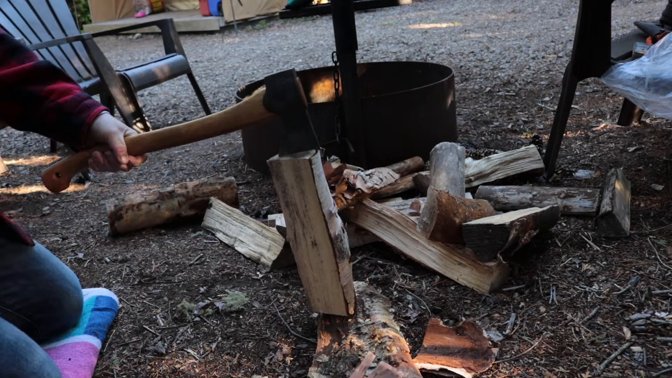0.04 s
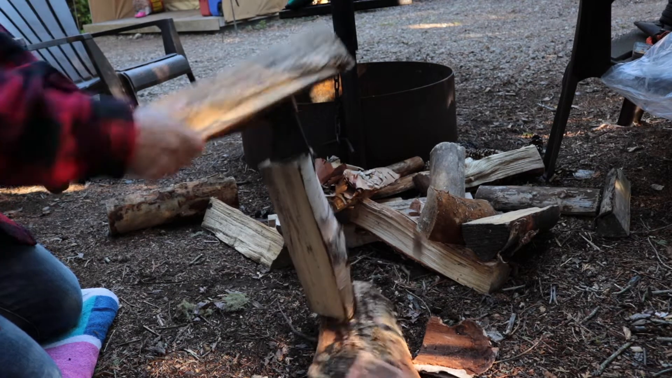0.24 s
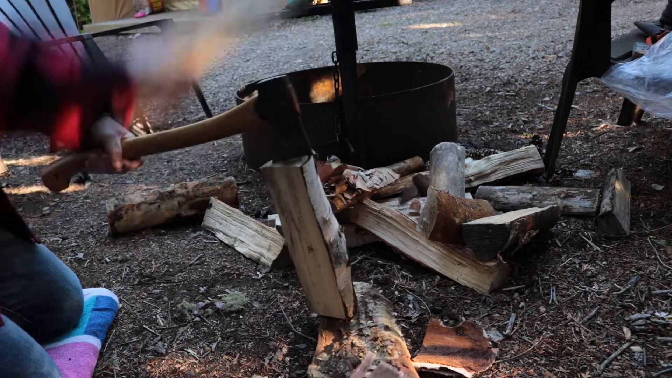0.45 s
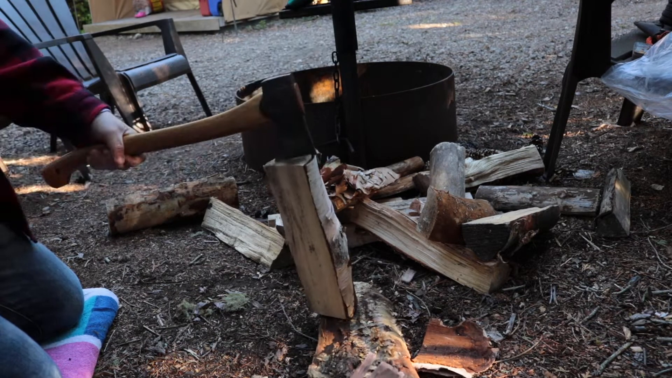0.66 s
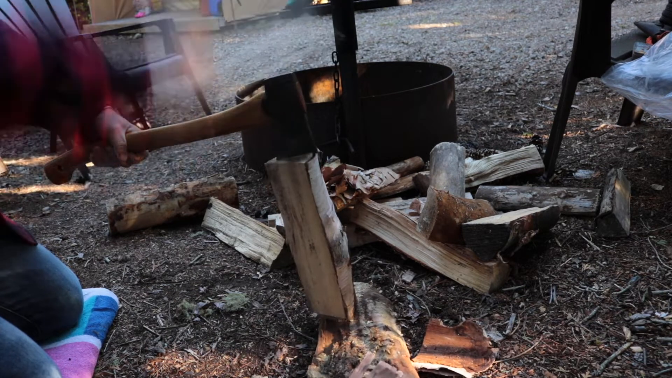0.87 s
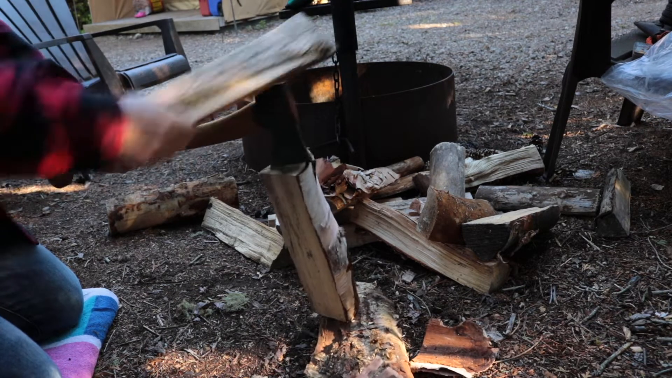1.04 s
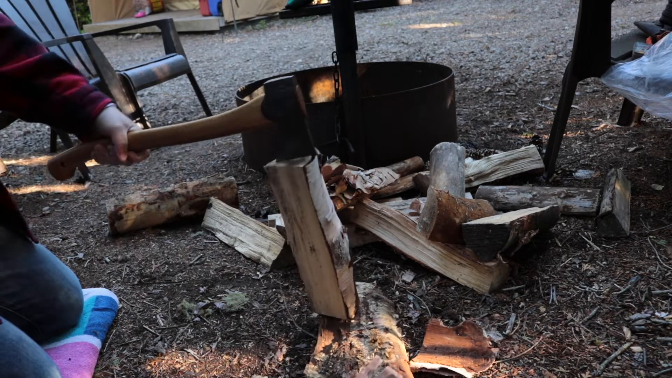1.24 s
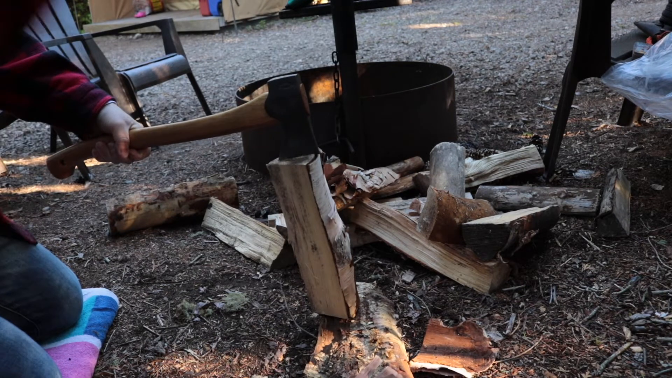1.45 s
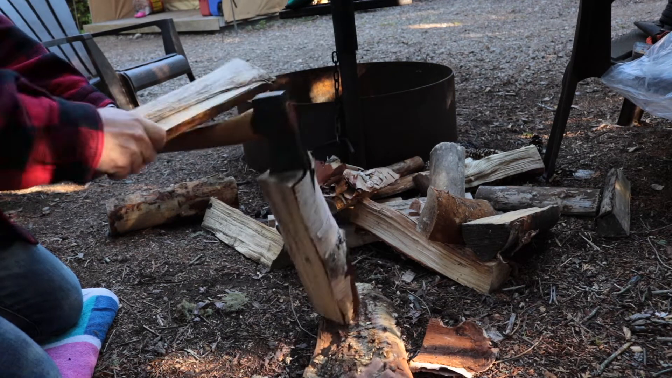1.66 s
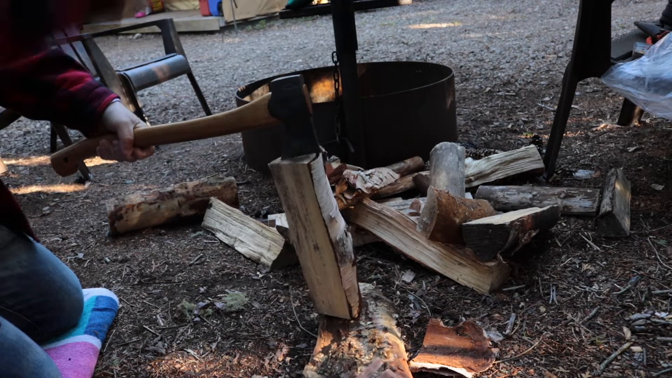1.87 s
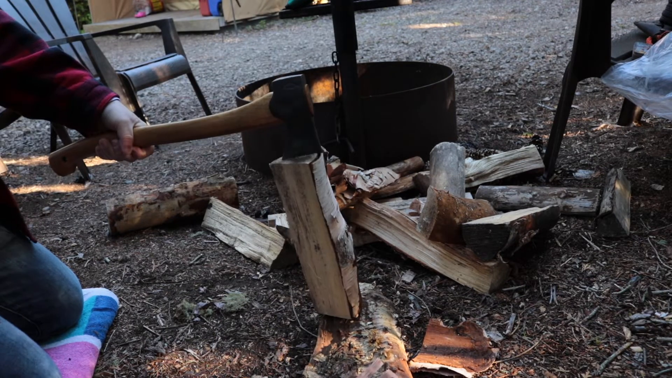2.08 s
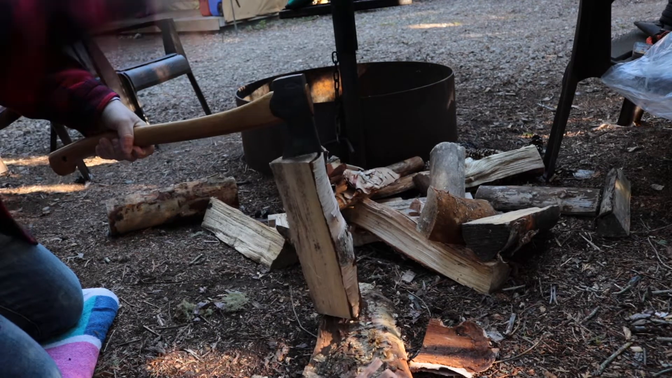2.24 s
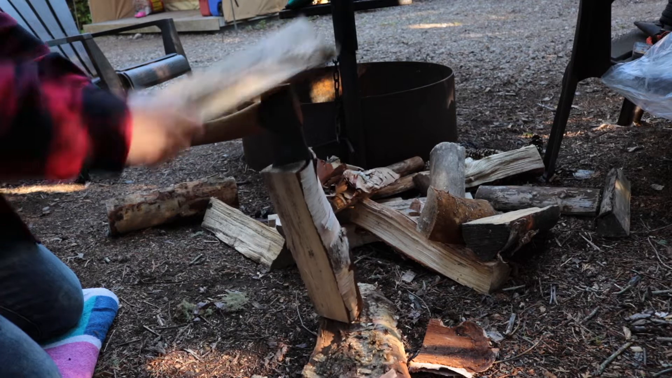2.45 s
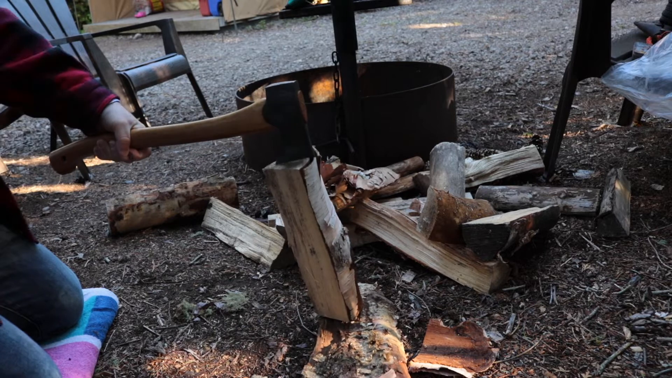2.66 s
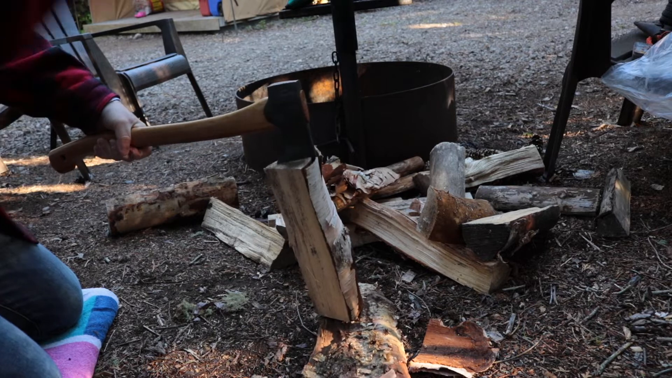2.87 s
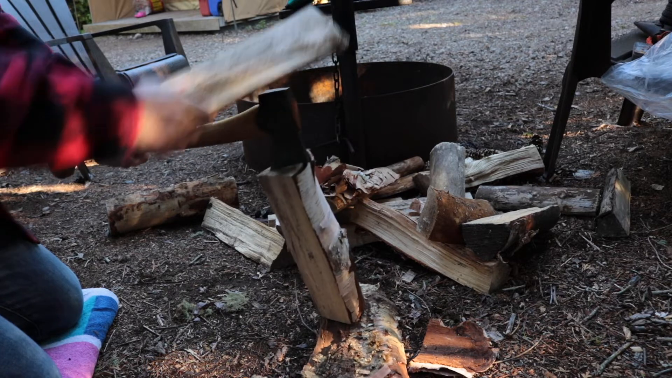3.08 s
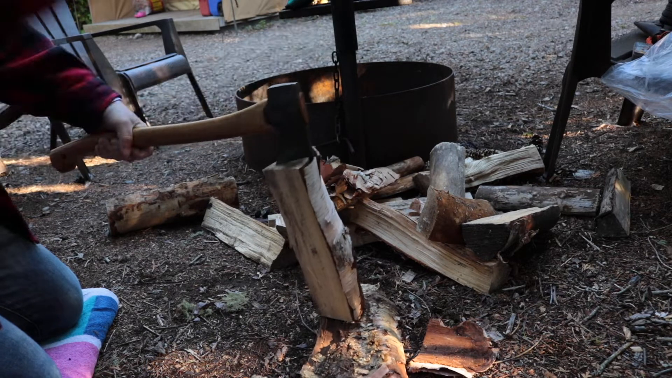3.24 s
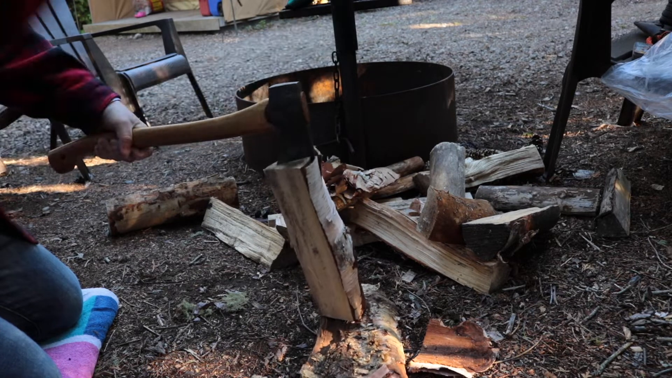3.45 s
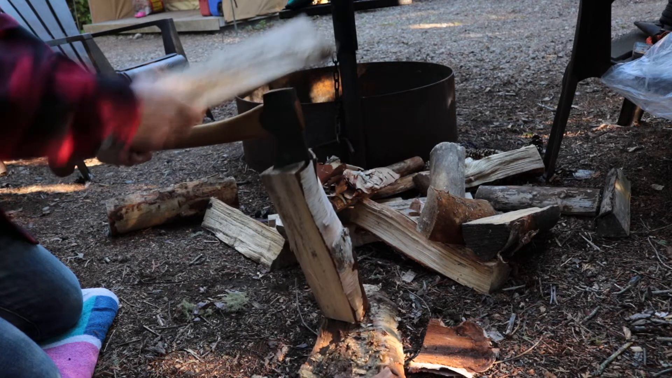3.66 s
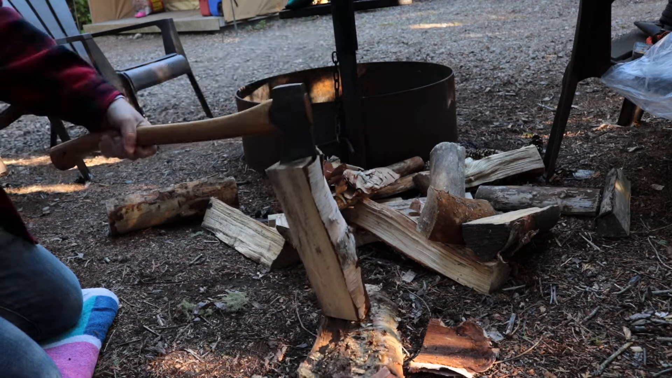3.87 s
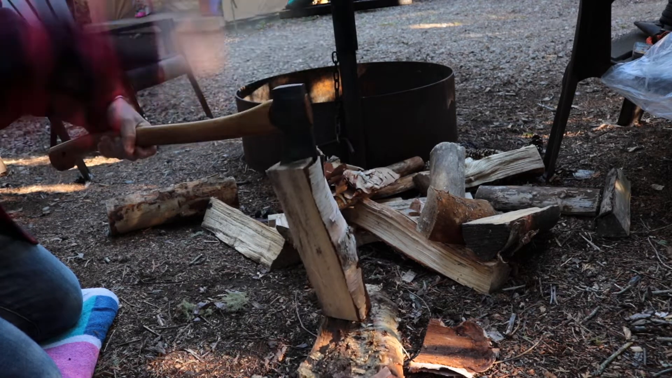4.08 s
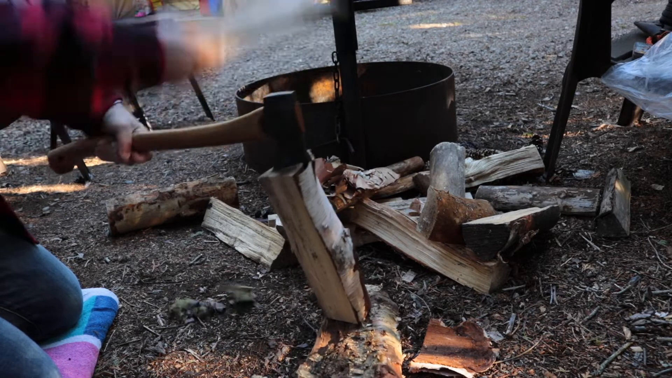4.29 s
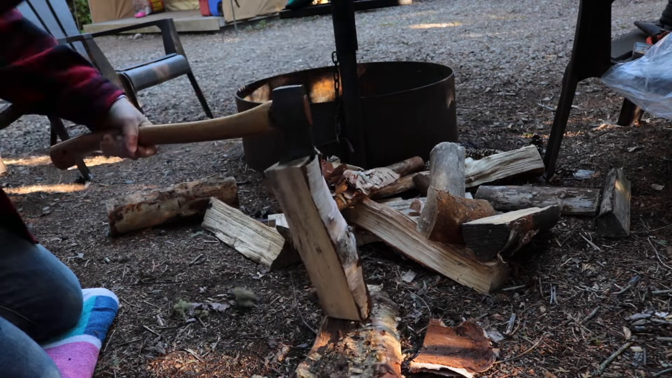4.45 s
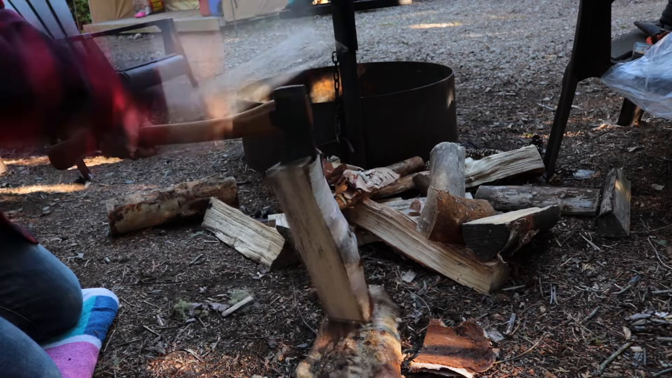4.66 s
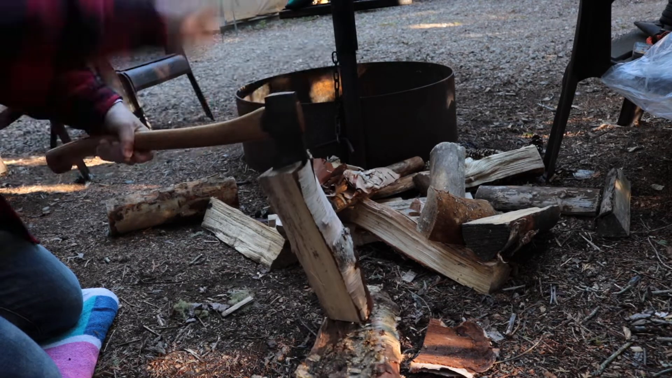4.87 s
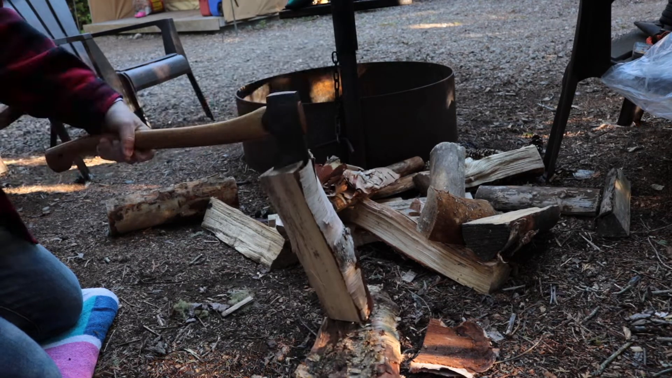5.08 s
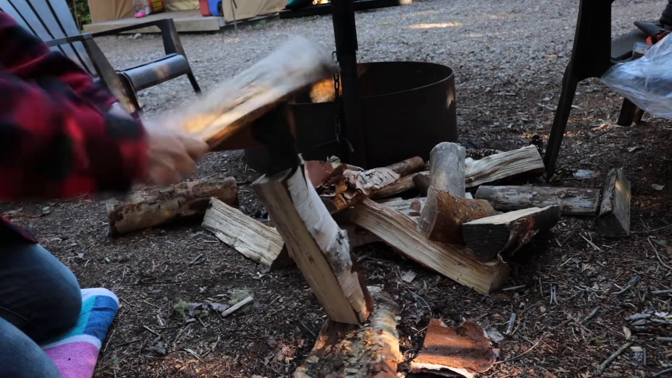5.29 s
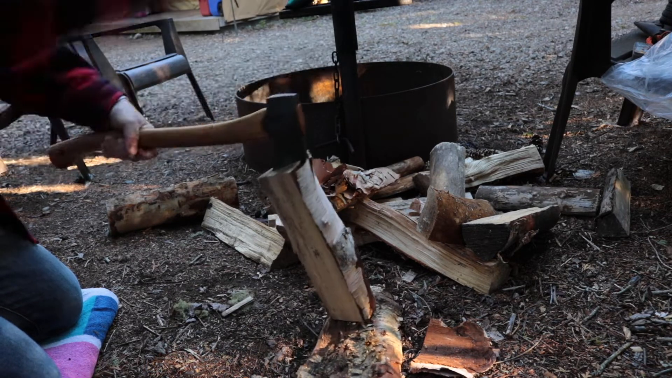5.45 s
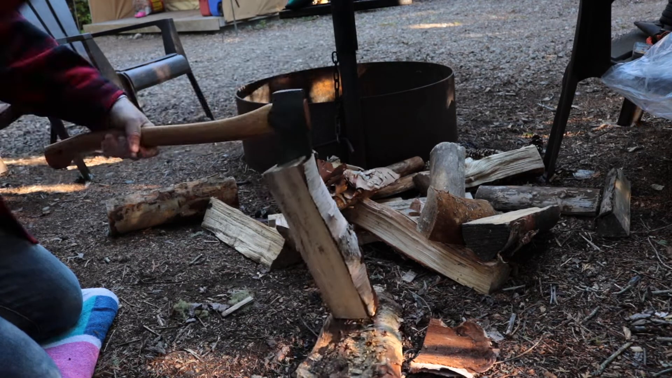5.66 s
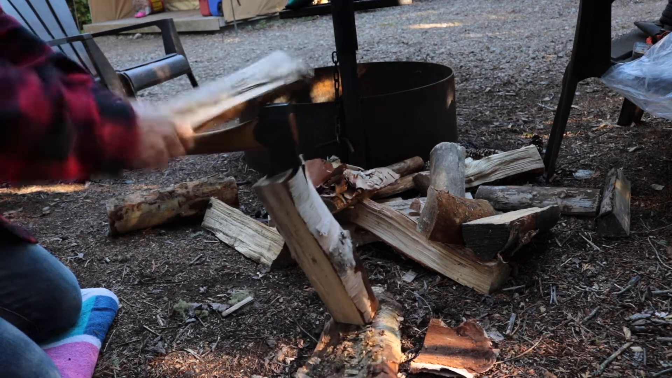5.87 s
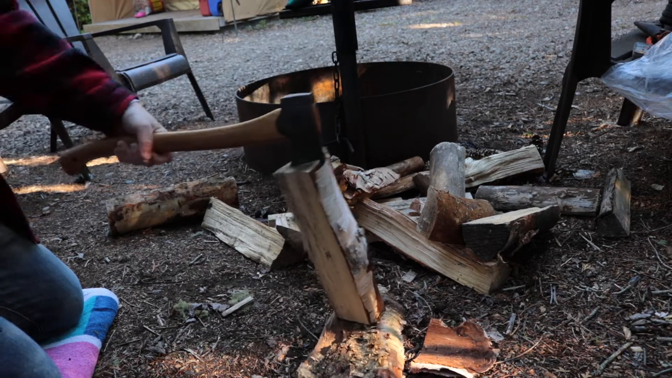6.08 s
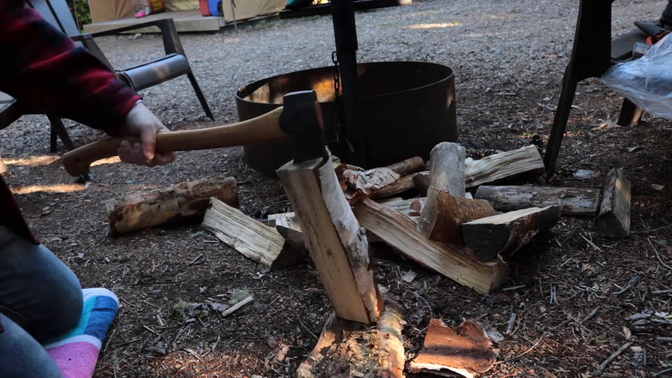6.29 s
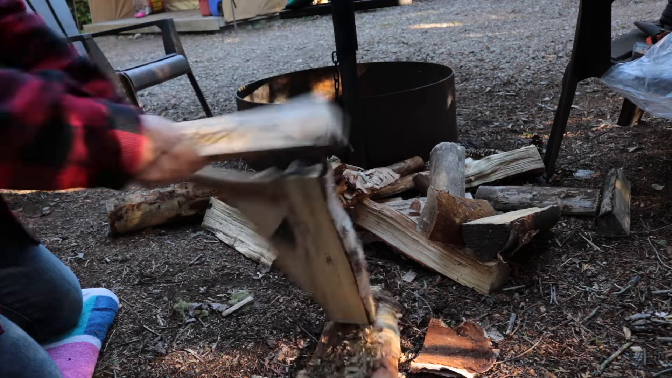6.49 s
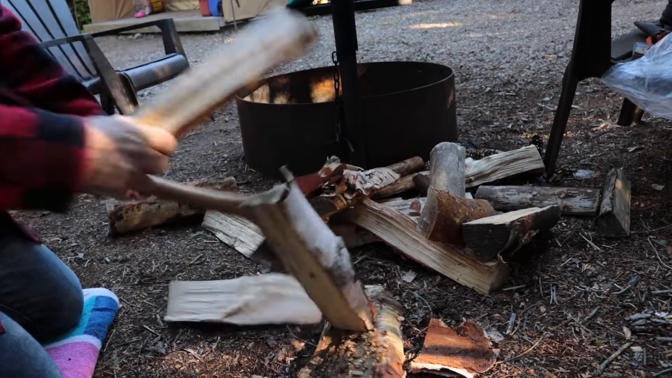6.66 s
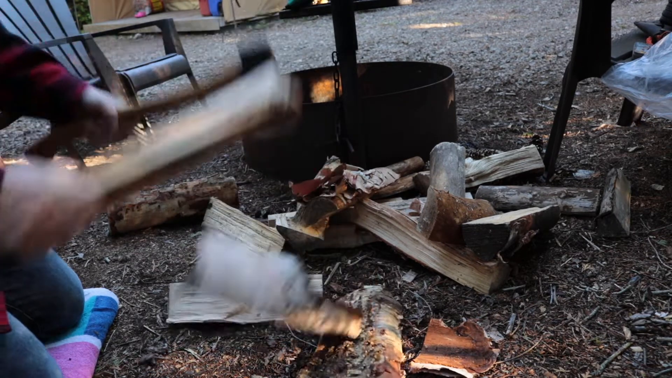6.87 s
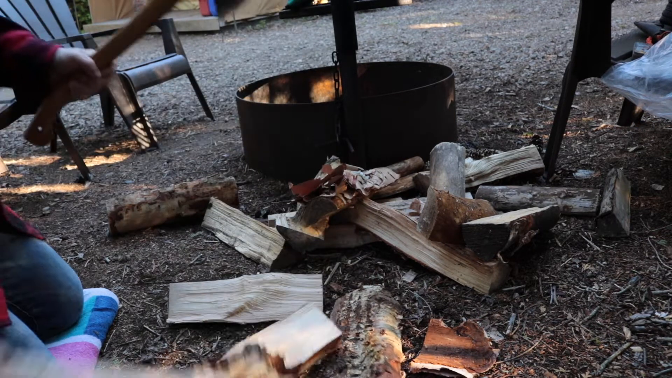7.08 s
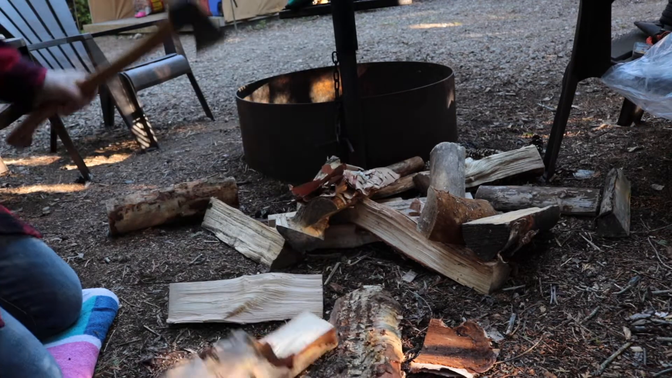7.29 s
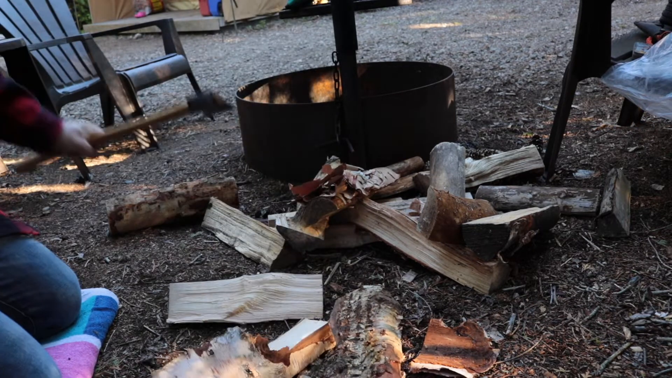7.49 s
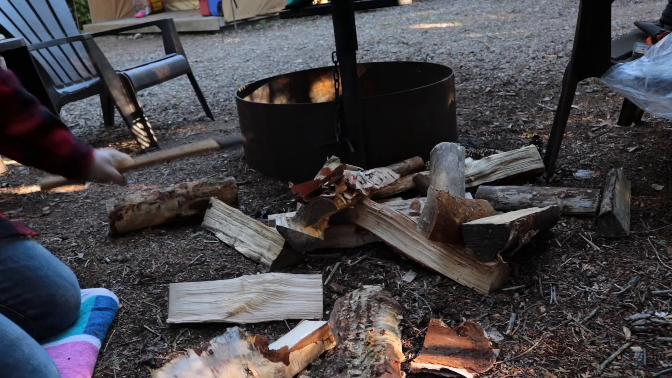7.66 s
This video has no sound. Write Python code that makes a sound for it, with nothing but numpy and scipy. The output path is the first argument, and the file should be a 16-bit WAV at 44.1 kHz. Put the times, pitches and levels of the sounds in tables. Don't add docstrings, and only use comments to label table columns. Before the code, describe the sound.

Outdoors among trees, with low wind rumble and faint leaf hiss, a wooden baton pounds a hatchet into a log very close to an overloading microphone. Blows land at about 0.2, 0.9, 1.6, 2.3, 3.0, 3.6, 4.1, 4.7, 5.3 and 5.8 s: hollow, short woody rings with a hard attack, some with a brief metallic clank, each over a dull ground thump. The log's foot knocks on its block right after, and a short, diffuse echo returns from the trees. Tiny fibre creaks, ticks and soft litter or sleeve rustles fill the gaps. At 5.96 s the wood splits with a loud, dry crack. A final blow at 6.5 s breaks through with sharp snaps; one half thuds down near 6.7 s, the other near 7.0 s, then bark scrapes, rolls and clicks among twigs, fading into quiet rustling and wind.

```python
import sys
import numpy as np
from scipy import signal
from scipy.fft import rfft, irfft
from scipy.io import wavfile
from scipy.ndimage import uniform_filter1d, map_coordinates

SR = 44100
rng = np.random.default_rng(int(sys.argv[2]) if len(sys.argv) > 2 else 0)


def nominal_scale(level):
    x = np.asarray(level, float) / 20
    return 10 ** x


def put_to_file(sound):
    columns = np.atleast_2d(sound).T
    safe = np.clip(columns, -1, 1)
    whole_steps = np.round(safe * 32767)
    wavfile.write(sys.argv[1], SR, whole_steps.astype(np.int16))


N = 340893


def along(points, hz):
    f, v = np.transpose(points)
    return np.interp(np.log(hz + 1), np.log(f + 1), v)


def curves(rows):
    s, *cols = np.transpose(rows)
    return [np.interp(np.arange(N) / SR, s, c) for c in cols]


def unit(x):
    return x / np.sqrt(np.mean(x ** 2) + 1e-20)


def wobble(rate):
    knots = rng.standard_normal(int(N * rate / SR) + 4)
    return map_coordinates(knots, [np.arange(N) * rate / SR])


def bump(middle_s, half_s):
    return np.exp(-((np.arange(N) / SR - middle_s) / half_s) ** 2)


def swells(rows):
    return sum(nominal_scale(db) * bump(s, half_s) for s, db, half_s in rows)


def rush(spectrum, patchy_db):
    z = signal.stft(rng.standard_normal(N), nperseg=512)[2]
    field = uniform_filter1d(uniform_filter1d(rng.standard_normal(z.shape), 6, 0), 12, 1)
    x = signal.istft(z * nominal_scale(patchy_db * unit(field)), nperseg=512)[1][:N]
    colour = nominal_scale(along(spectrum, np.fft.rfftfreq(N, 1 / SR)))
    return unit(irfft(rfft(x) * colour, N))


def ring(t, hz, db, t60, rise):
    return nominal_scale(db - 60 * t / t60) * (1 - np.exp(-t / rise)) * np.sin(2 * np.pi * hz * t)


def burst(t, hz, width_hz, t60, grit_db=0):
    x = rng.standard_normal(len(t)) * nominal_scale(-60 * t / t60) * (1 - np.exp(-t / 0.000052))
    grit = np.repeat(rng.standard_normal(len(t) // 24 + 1), 24)[:len(t)]
    x *= nominal_scale(grit_db * grit)
    peak = signal.iirpeak(min(hz, SR / 3), max(hz / width_hz, 0.5), SR)
    x = signal.lfilter(*peak, signal.lfilter(*peak, x))
    return x / np.max(np.abs(x))


def add(track, s, x):
    start = round(s * SR)
    track[start:][:len(x)] += x[:len(track) - start]


# time_s, level_db
WIND = [(0.0, -44), (1.05, -44), (1.46, -38), (1.68, -42.5), (2.37, -38.5), (2.67, -46), (3.05, -40.5),
        (3.34, -47), (3.96, -41), (4.11, -37), (4.39, -46.5), (4.8, -44), (5.36, -42.5), (5.81, -40.5),
        (5.92, -42.5), (6.42, -44.5), (7.32, -43.5), (7.73, -42.5)]
# middle_s, lift_db, half_s
PUFFS = [(.34, 6, .05), (.74, 4.5, .08), (1.35, 2, .08), (1.91, 6.5, .07), (2.8, 2, .05), (3.33, 2, .05),
         (4.5, 3, .06), (5.45, 1.5, .05), (5.7, 0.5, .06), (6.42, 3, .1), (6.05, -3.5, .05),
         (2.55, -2.5, .06), (3.85, -5, .06)]
# freq_hz, density_db
RUMBLE = [(12, -49.5), (20, -3), (43, 5.5), (91, 2.5), (158, -6), (230, -18.5), (400, -28), (560, -56.5)]
# freq_hz, density_db
LEAVES = [(120, -23), (220, -5.5), (900, -11.5), (2000, -18), (3700, -9.5), (5000, -22.5), (8000, -29),
          (15500, -38)]
LEAF_DB, LEAVES_FOLLOW = -54, 0.13
SURGE_DB, SURGE_LEAD_S, SURGE_S = 1, 0.024, 0.11


def wind():
    gust_db, = curves(WIND)
    surge_db = SURGE_DB * sum(bump(s - SURGE_LEAD_S, SURGE_S) for s, *_ in BLOWS)
    puff_db = sum(db * bump(s, half_s) for s, db, half_s in PUFFS)
    rumble_db = gust_db + 3.0 + surge_db + puff_db
    lumps = nominal_scale(0.6 * wobble(3) + 0.8 * wobble(11))
    rumble = nominal_scale(rumble_db) * unit(lumps * rush(RUMBLE, patchy_db=1.4))
    hiss_db = LEAF_DB + LEAVES_FOLLOW * (gust_db - gust_db.mean()) + 2.0 + 0.51 * wobble(1.6)
    return rumble + nominal_scale(hiss_db) * rush(LEAVES, patchy_db=1.83)


# middle_s, peak_db, half_s
STIRS = [(0.12, -63.5, 0.059), (0.55, -66, 0.15), (1.29, -63, 0.2), (2.4, -64, 0.2), (3.02, -49, 0.04),
         (3.3, -67, 0.082), (3.87, -62.5, 0.1), (4.32, -60, 0.11), (4.703, -60.5, 0.44),
         (5.547, -59.5, 0.18), (6.02, -56, 0.048), (6.644, -42.5, 0.045), (7.03, -52.5, 0.13),
         (7.19, -50, 0.06), (7.448, -54.5, 0.09)]
LITTER_REST_DB = -80.5
GRAINS_PER_S, GRAIN_DECAY_S = 110, 0.002


def litter():
    sizes = nominal_scale(5.1 * rng.exponential(1, N).clip(0, 3))
    grains = (rng.random(N) < GRAINS_PER_S / SR) * sizes
    swell = np.sqrt(signal.lfilter([1], [1, -np.exp(-1 / (GRAIN_DECAY_S * SR))], grains ** 2))
    hiss = rush([(1500, -49.5), (3000, 2.5), (6000, 7), (11000, 1.5), (16000, 4.0)], patchy_db=0.8)
    stirring = nominal_scale(LITTER_REST_DB) + swells(STIRS)
    return stirring * nominal_scale(-5.2) * unit(hiss * (1 + 0.4 * swell))


# middle_s, peak_db, half_s
SLEEVE = [
    (2.056, -68.5, 0.12),
    (3.316, -60, 0.095),
    (3.526, -58, 0.06),
    (5.719, -62.5, 0.09),
]


def sleeve():
    cloth = rush([(2200, -30), (3800, -4), (5200, 0), (6800, -4), (9500, -18), (14000, -40)], patchy_db=1.5)
    return cloth * swells(SLEEVE)


# middle_s, peak_db, half_s
SCRAPES = [
    (6.535, -51, .025),
    (6.636, -45, .03),
    (7.005, -53, .012),
    (7.042, -50, 0.022),
    (7.124, -41, .02),
    (7.15, -42, .012),
    (7.2, -44, .018),
    (7.383, -59, .04),
]
# freq_hz, density_db
BARK = [(350, -40), (800, -5), (1600, 3), (2500, -8), (3500, 6), (4300, -6), (6000, -17), (12000, -40)]


def scrapes():
    grit = nominal_scale(4.9 * wobble(260))
    return unit(grit * rush(BARK, patchy_db=4.5)) * swells(SCRAPES)


# freq_hz, t60_s
TREES = [(200, 0.26), (1300, 0.59), (3500, 0.71), (7000, 0.087), (14000, 0.058)]
# freq_hz, gain_db
TREE_COLOUR = [(150, 11), (600, -1), (1340, 4), (2200, 4.5), (3000, 3.5), (3800, 4.5), (5500, -16),
               (14000, 11)]


def trees(x):
    out, step = np.zeros(N + SR), SR // 2
    for start in range(0, N, step):
        hz, t, z = signal.stft(rng.standard_normal(SR * 3 // 4), SR, nperseg=256)
        decay_db = 60 * t / along(TREES, hz)[:, None]
        build_up = 1 - np.exp(-(t / 0.0035) ** 2)
        shape = nominal_scale(along(TREE_COLOUR, hz)[:, None] - decay_db) * build_up
        flutter = nominal_scale(2.5 * rng.standard_normal(len(t)))
        tail = signal.istft(z * shape * flutter, SR, nperseg=256)[1]
        echo = signal.fftconvolve(x[start:start + step], tail / np.linalg.norm(tail))
        add(out, start / SR, echo)
    return out[:N]


# freq_hz, width_hz, level_db
HEAD_ECHO = [(2910, 130, 1), (3150, 150, -2), (2020, 300, -6)]
# freq_hz, width_hz, level_db
SPLIT_ECHO = [(1510, 200, -4), (2700, 250, -8), (3250, 250, -5.5), (3700, 600, 2), (7600, 500, -8.5)]
ECHO_RING_DB, ECHO_BODY_DB, ECHO_BRIGHT_DB, ECHO_HEAD_DB = -31.5, -33, -38.5, -35
SPLIT_ECHO_DB, SPLIT_ECHO_T60_S = -28.5, 0.62


def undergrowth():
    out, t = np.zeros(N), np.arange(SR * 3 // 5) / SR
    swell = 1 - np.exp(-(t / 0.036) ** 3)
    for (s, _, hz, _, echo_db), (_, bright_db, head_db, _, bright_hz) in zip(BLOWS, SQUARE):
        tone = burst(t, 1.04 * hz, 390, 0.5) + nominal_scale(-6) * burst(t, 1.01 * hz, 190, 1.0)
        body = nominal_scale(ECHO_BODY_DB + 14.0) * burst(t, 1400, 2200, 0.19)
        bright = nominal_scale(ECHO_BRIGHT_DB + 2) * burst(t, bright_hz, 950, 0.55)
        head = sum(nominal_scale(ECHO_HEAD_DB + head_db + g) * burst(t, f, w, 0.39) for f, w, g in HEAD_ECHO)
        air = nominal_scale(ECHO_BRIGHT_DB - 11.5) * burst(t, 6000, 6000, 0.22)
        echo = nominal_scale(ECHO_RING_DB + 3) * tone + body + head + nominal_scale(bright_db) * (bright + air)
        add(out, s, nominal_scale(echo_db) * swell * echo)
    wide = burst(t, 890, 2400, SPLIT_ECHO_T60_S) + nominal_scale(1.5) * burst(t, 2900, 3500, SPLIT_ECHO_T60_S)
    wide += sum(nominal_scale(g - 7.5) * burst(t, f, w, SPLIT_ECHO_T60_S) for f, w, g in SPLIT_ECHO)
    add(out, SPLIT[0][0], nominal_scale(SPLIT_ECHO_DB) * (1 - np.exp(-(t / 0.019) ** 2)) * wide)
    return out


# start_s, peak_db, centre_hz
TICKS = [(5.8865, -30, 3500), (5.898, -36, 3600), (6.4912, -12, 9000), (6.4972, -11, 11000),
         (6.5035, -22, 9000), (6.5305, -31, 11000), (6.6525, -37, 6000), (6.7065, -8, 4800),
         (6.716, -34, 12000), (6.7632, -44, 9000), (6.92, -41, 9000), (7.0278, -13, 9000),
         (7.0865, -44, 11000), (7.1568, -19, 8000), (7.183, -36, 12000), (7.2365, -34, 8000),
         (7.2715, -37, 11000), (7.32, -49, 9000), (1.5875, -20, 6000), (2.601, -20, 3200),
         (0.9385, -24, 5000), (4.3593, -16, 3000), (7.33, -48, 8500), (7.3775, -38, 4000),
         (7.384, -46, 9000), (7.4385, -43, 8000), (7.485, -50, 7500), (7.498, -49, 10000),
         (7.513, -48, 10000), (7.5195, -35, 14000), (7.527, -48, 13000), (7.534, -47, 12000),
         (7.6624, -31, 4500), (7.665, -39, 8200), (6.0695, -43, 7500), (4.3445, -41, 8500)]
# start_s, level_db, pitch_hz
CLANKS = [
    (0.9228, 11, 2800),
    (1.5683, 21, 3400),
    (2.9815, 6, 3100),
    (4.1412, 13, 3500),
    (4.1395, 8, 2200),
    (5.8208, 8, 3000),
    (1.5778, -2, 2700),
    (4.155, -5, 2200),
]
TICK_T60_S, TICK_WIDE, CLANK_T60_S = 0.004, 1.25, 0.011


def ticks():
    out, t = np.zeros(N), np.arange(SR // 50) / SR
    for s, db, hz in TICKS:
        add(out, s, nominal_scale(db) * burst(t, hz, TICK_WIDE * hz, TICK_T60_S))
    for s, db, hz in CLANKS:
        add(out, s, ring(t, hz, db, CLANK_T60_S, 0.0003))
    return out


# start_s, level_db, pitch_hz, t60_s
CHIPS = [(0.2065, -26, 3020, 0.018), (0.2245, -21, 1930, 0.015), (0.2255, -26, 4200, .015),
         (0.226, -20.5, 1250, 0.018), (2.424, -37, 6600, 0.013), (2.425, -30, 2500, .02),
         (2.602, -29, 14200, .008), (4.3592, -8, 2700, .011), (4.3592, -17, 6560, 0.011),
         (4.3638, -19, 4300, 0.012), (6.491, -19, 6200, .012), (6.491, -16, 8500, .012),
         (6.503, -24, 7200, .012), (6.5, -31, 3480, 0.029), (6.5292, -34, 2280, .05),
         (6.5521, -34, 1150, .04), (6.6092, -24, 1150, 0.034), (6.609, -37, 3860, .02),
         (6.693, -31, 5700, .015), (6.6925, -26, 3600, .015), (6.697, -23, 2325, 0.048),
         (6.702, -23.5, 1880, 0.045), (6.706, -8, 4440, 0.015), (6.7055, -13, 7500, 0.0094),
         (6.7055, -17, 3300, 0.024), (6.7055, -15, 5850, 0.011), (6.715, -28, 4340, 0.014),
         (7.021, -25, 1460, .02), (7.026, -24, 4160, 0.018), (7.082, -43, 700, 0.023),
         (7.108, -28, 3870, .025), (7.109, -30, 2920, .03), (7.109, -34.5, 1570, 0.045),
         (7.1445, -21, 3450, 0.012), (7.147, -29, 1590, 0.035), (7.157, -21.5, 2670, 0.014),
         (7.1845, -29, 1007, 0.03), (7.184, -30, 3840, .018), (7.185, -24, 2100, 0.017),
         (7.236, -24.5, 3400, .01), (7.2365, -37, 6400, .006), (7.236, -31.5, 2000, .008),
         (6.4795, -7, 2100, .02), (5.966, -15, 1053, .02), (4.3594, -21, 900, .012),
         (7.52, -40, 14000, .008), (7.0256, -28, 14000, .015), (7.1565, -28, 14000, 0.0087),
         (6.9414, -42, 14000, .012), (0.192, 0, 2100, 0.011)]


def chips():
    out, t = np.zeros(N), np.arange(SR // 16) / SR
    for s, db, hz, t60 in CHIPS:
        tap = ring(t, hz, db, t60, 0.0002)
        add(out, s, tap + nominal_scale(db - 11) * burst(t, hz, 0.21 * hz, t60))
    return out


# start_s, peak_db, soil_hz, t60_s, wood_db
FALLS = [
    (6.693, -18, 71, 0.091, 2.5),
    (6.7095, -17, 77.6, 0.057, -4),
    (6.7181, -21.5, 52.3, 0.13, -9),
    (7.023, -20, 56, 0.14, 1.5),
    (7.0398, -23.5, 56.6, 0.07, -3),
]


def falls():
    out, t = np.zeros(N), np.arange(SR // 3) / SR
    for s, db, hz, t60, wood_db in FALLS:
        thump = ring(t, hz, db + 11.0, t60, 0.013) + ring(t, 98.5, db + 3.5, 0.091, 0.005)
        add(out, s, thump - ring(t, 174, db + wood_db + 8.5, 0.015, 0.00049))
    return out


# start_s, peak_db, middle_db
FIBRES = [(0.0717, -37, -7), (0.31, -45, 6), (0.377, -39, -11), (0.6494, -44.5, 7), (0.667, -35, -8),
          (1.7517, -44, -9), (1.81, -42, -12), (1.8522, -44, -7), (2.4245, -37, -3), (3.245, -47, -6),
          (3.27, -47, -12.5), (3.285, -46, -15), (3.7813, -40.5, 2.5), (4.2652, -26.5, -2),
          (4.3114, -48.5, 0), (4.345, -48, -8), (4.4583, -44.5, 8), (4.5715, -42, -12.5),
          (4.9962, -47.5, 10.5), (5.5498, -46.5, 8), (6.0691, -46, -7), (6.1404, -51, 7), (0.2645, -32, -2),
          (0.2065, -39, -13), (0.2245, -35, -3), (5.898, -56, 14)]
# start_s, peak_db, t60_s, middle_db, woody_db
CRACKS = [(0.2748, -27.5, 0.0062, -1, 1), (2.6006, -24, 0.0071, 4, -20), (4.3594, -14, 0.012, 7, -3.5),
          (6.4764, -3.5, 0.021, -6, -0.5), (6.4902, -4, 0.032, -14, -33), (6.4962, -16, 0.017, -7, -24),
          (6.502, -23, 0.04, -12, -25), (6.5843, -26, 0.0063, -24, -15), (6.7075, -19, 0.013, 3, -11),
          (7.0265, -19, 0.044, -8, -14), (7.157, -25, 0.008, 0, -1)]
# start_s, peak_db, middle_db, woody_db
TWIGS = [(6.52, -32, -5, -6), (6.5288, -35, 6, -10), (6.5524, -48, 12, 9), (6.6078, -42, 4, 14),
         (6.65, -50, 9, -5), (6.6867, -39.5, 13, 6), (6.694, -31, 11, -1), (6.7154, -31, -2, -17),
         (6.799, -46, 10, -8), (6.8324, -43, 2, -2), (6.9404, -35.5, 7, -5), (6.954, -35, -1, -9),
         (7.0226, -31.5, 16.5, 11.5), (7.0854, -48, 0, 3), (7.1077, -32.5, 2, -2), (7.1244, -48, -2, -3),
         (7.1436, -29, 2, -3), (7.1844, -38, 6, 18), (7.201, -45, 12, 10), (7.2362, -44, -6, -8),
         (7.272, -50, -15, -23.5), (7.367, -45, -1, -10), (7.377, -43, 5.5, -7), (7.398, -44, -11, -15),
         (7.461, -47, -8, -18), (7.436, -41, -23.5, -9), (7.5193, -41, -27.5, -5), (7.6624, -36, 4, -23)]
# start_s, peak_db, t60_s
SPLIT = [
    (5.9551, -2, 0.03),
    (5.9579, 2, 0.017),
    (5.9645, -5, 0.015),
]
# freq_hz, width_hz, level_db
SPLIT_WOOD = [(1497, 23, 13), (2920, 71, 5), (3300, 79, 1.5), (900, 50, 1.5), (335, 24, -16.5)]
FIBRE_T60_S, FIBRE_WOOD_DB, TWIG_T60_S = 0.013, -12, 0.022
WOODY_HZ, WOODY_SPREAD = 1350, 0.2


def snaps():
    out, t = np.zeros(N), np.arange(SR // 12) / SR
    fibres = [(s, db, FIBRE_T60_S, middle_db, FIBRE_WOOD_DB) for s, db, middle_db in FIBRES]
    twigs = [(s, db, TWIG_T60_S, *parts) for s, db, *parts in TWIGS]
    for s, db, t60, middle_db, wood_db in CRACKS + twigs + fibres:
        wood_hz = WOODY_HZ * np.exp(WOODY_SPREAD * rng.standard_normal())
        spit = burst(t, 10000, 9800, 0.61 * t60, grit_db=5.5)
        rasp = nominal_scale(middle_db) * burst(t, 3000, 3200, 1.7 * t60, grit_db=5.5)
        click = nominal_scale(wood_db) * burst(t, wood_hz, 0.58 * wood_hz, 2.56 * t60)
        add(out, s, nominal_scale(db) * (spit + rasp + click))
    for s, db, t60 in SPLIT:
        crack = sum(nominal_scale(0.4 * g) * burst(t, f, 8 * w, t60) for f, w, g in SPLIT_WOOD)
        crack += nominal_scale(-10.5) * burst(t, 6700, 8000, 0.6 * t60, grit_db=3)
        add(out, s, nominal_scale(db) * crack)
    return out


# start_s, peak_db, pitch_hz, rough_db
KNOCKS = [(0.2649, -20, 386, -6), (1.927, -34, 300, -2.5), (2.433, -15.5, 300, -6), (2.433, -4, 744, -16),
          (2.45, -25, 500, -4), (4.207, -19, 300, -8), (4.3597, -31, 900, 3.5), (5.957, -5.5, 533, -6),
          (5.961, 0.5, 750, -2), (5.988, -21, 545, -12), (6.467, -1, 326, -7.5), (6.468, -27, 280, -4),
          (6.608, -21.5, 402, 0.5), (7.0227, -26, 388, -5), (7.028, -18.5, 300, -10), (7.15, -33, 450, -19),
          (7.1848, -13.5, 900, -3.5)]
# start_s, peak_db, log_db, touch_db
LANDINGS = [
    (0.207, -15, -10, -25),
    (0.9381, -6, 3, -28),
    (1.5845, -7, 7, -9),
    (2.3371, -6, 0, -27),
    (2.9932, -4, 2, -27),
    (3.5932, -7, 1, -24),
    (4.1535, -1, 4, -12),
    (4.7278, -4, 3, -24),
    (5.2826, -5, 1, -27),
    (5.841, -9, -12, -27),
]
# start_s, peak_db, touch_db
REBOUNDS = [
    (0.2243, -23, -11),
    (0.962, -13, -31.5),
    (2.36, -21, -24.5),
    (3.013, -19, -37),
    (3.6158, -14, -43),
    (4.178, -21.5, -37.5),
    (4.7488, -17.5, -38),
    (5.3028, -13.5, -17),
    (5.8872, -17, -33),
]
LANDING_HZ, REBOUND_HZ, FOOT_ROUGH_DB = 292, 315, -0.5
LOG_HZ, LOG_DB, LOG_T60_S = 737, 0.5, 0.022


def knocks():
    out, t = np.zeros(N), np.arange(SR // 8) / SR
    landings = [(s, db, LANDING_HZ, FOOT_ROUGH_DB, db + touch_db) for s, db, _, touch_db in LANDINGS]
    rebounds = [(s, db, REBOUND_HZ, FOOT_ROUGH_DB, touch_db) for s, db, touch_db in REBOUNDS]
    bumps = [(*row, -np.inf) for row in KNOCKS]
    for s, db, hz, rough_db, touch_db in landings + rebounds + bumps:
        push = -ring(t, hz, db + 0.5, 7 / hz, 0.068 / hz)
        rough = burst(t, 2 * hz, 1.9 * hz, 0.016) + nominal_scale(-28) * burst(t, 2800, 1800, 0.012)
        touch = nominal_scale(touch_db) * burst(t, 1500, 1600, 0.016)
        add(out, s, push + nominal_scale(db + rough_db) * rough + touch)
    for s, db, log_db, _ in LANDINGS:
        add(out, s, ring(t, LOG_HZ * rng.normal(1, 0.03), db + log_db + LOG_DB, LOG_T60_S, 0.0004))
    for s, db, _ in REBOUNDS:
        add(out, s, ring(t, LOG_HZ, db - 5.5, LOG_T60_S, 0.0004))
    return out


# start_s, ring_db, ring_hz, choke_s (ring cut short at landing), echo_db (undergrowth)
BLOWS = [(0.1907, -5.5, 1338, 0.012, -3.5), (0.922, -1.5, 1343, 0.03, 1.5), (1.568, 1, 1365, 0.022, 1.5),
         (2.319, 4, 1358, 0.021, 5.5), (2.98, -1, 1350, 0.016, -8), (3.576, 1.5, 1357, 0.025, 2.5),
         (4.1395, 0, 1348, 0.018, -5), (4.7102, 0.5, 1352, 0.02, -2), (5.263, 4, 1345, 0.034, 5),
         (5.82, 5, 1347, 0.023, 1), (6.465, 0.5, 1357, 0.027, -4)]
# steel_db, bright_echo_db, head_echo_db, upper_over_lower_modes_db, bright_echo_hz
SQUARE = [(1.5, 1.5, -2, 2, 3700), (7, -3, 2.5, 1, 3800), (-2.5, 12, 4.5, 1.5, 3350),
          (-4, 2, -2.5, 3.5, 3700), (-9, 10, 0, -1.5, 3500), (0.5, -4, 2.5, 0, 3800),
          (-8, 0, -1, -0.5, 3400), (-1, -6.5, 3, 0.5, 3700), (-0.5, -4, 1, 0, 3500), (3, 2.5, 2.5, 1, 2900),
          (-0.5, -1.5, -3, 0, 3500)]
# freq_hz, level_db, t60_s
BATON = [(731, 6.5, 0.0095), (559.7, -2.5, 0.011), (391, -1.5, 0.016), (300, -5, 0.0077),
         (900, -17.5, 0.0041)]
# freq_hz, width_hz, level_db, t60_s
STEEL = [(3010, 120, -56, 0.3)]
LOW_DB, LOW_FOLLOWS = 2, 0.11
THUMP_DB, THUMP_GROWS_DB, THROUGH_DB = -0.6, 0.51, -29
CHOKE_DB, CHOKE_S, RING_LEFT_DB = -3, 0.0013, -29
RING_STARTS_FLAT, RING_SETTLES_S = 0.024, 0.006


def blows():
    air, soil, t = np.zeros(N), np.zeros(N), np.arange(SR // 2) / SR
    thumps_db = np.append(THUMP_DB + THUMP_GROWS_DB * np.arange(len(BLOWS) - 1), THROUGH_DB)
    ring_t = t - RING_STARTS_FLAT * RING_SETTLES_S * (1 - np.exp(-t / RING_SETTLES_S))
    for (s, db, hz, choke_s, _), thump_db, (steel_db, _, _, upper_db, _) in zip(BLOWS, thumps_db, SQUARE):
        choke = nominal_scale(CHOKE_DB * np.logaddexp(0, (t - choke_s) / CHOKE_S))
        x = (choke + nominal_scale(RING_LEFT_DB)) * ring(ring_t, hz, 0, 0.044, 0.0019)
        low_db = LOW_DB - (1 - LOW_FOLLOWS) * db
        for f, g, t60 in BATON:
            mode_db = low_db + g + upper_db * np.log2(f / 500) + rng.normal(0, 1)
            x += ring(t, f * rng.normal(1, 0.041), mode_db, t60, 0.00017)
        x += nominal_scale(1.5) * burst(t, 3400, 5000, 0.006)
        x += nominal_scale(steel_db / 2 - db - 21.0) * burst(t, 2900, 1600, 0.043)
        x += nominal_scale(steel_db - db - 5.5) * burst(t, 2974, 900, 0.013)
        x += sum(nominal_scale(g + steel_db - db) * burst(t, f, w, t60) for f, w, g, t60 in STEEL)
        add(air, s, nominal_scale(db + 17.5) * x)
        thump = ring(t, 61, thump_db - 10.5, 0.094, 0.0023) + ring(t, 140, thump_db - 19.0, 0.06, 0.003)
        add(soil, s + 0.017, thump)
    return air, soil


def scene():
    air, soil = blows()
    near = air + knocks() + snaps() + chips()
    sway = 1 + 0.3 * wobble(200)
    echoes = nominal_scale(-45.0) * sway * trees(near) + undergrowth()
    ground = soil + falls() + litter() + scrapes() + ticks()
    return (near + echoes + ground + sleeve() + wind())[None]


def band_limit(x):
    return signal.sosfilt(signal.butter(12, 17060, fs=SR, output="sos"), x)


def record(dry):
    top, release_s = 0.6, 0.06
    x = dry / (1 + np.abs(dry / top) ** 12) ** (1 / 12)
    keep = np.exp(-1 / (release_s * SR))
    load = signal.lfilter([1 - keep], [1, -keep], x ** 2, axis=1)
    x = x / (1 + 1.1 * load)
    hz = np.fft.rfftfreq(N, 1 / SR)
    edge = nominal_scale(np.interp(hz, [15700, 15900, 16900, 17100], [0, -14, -24, -90]))
    mix = irfft(rfft(x) * edge, N)
    return band_limit(mix)


dry = scene()
out = record(dry)
put_to_file(out)
```